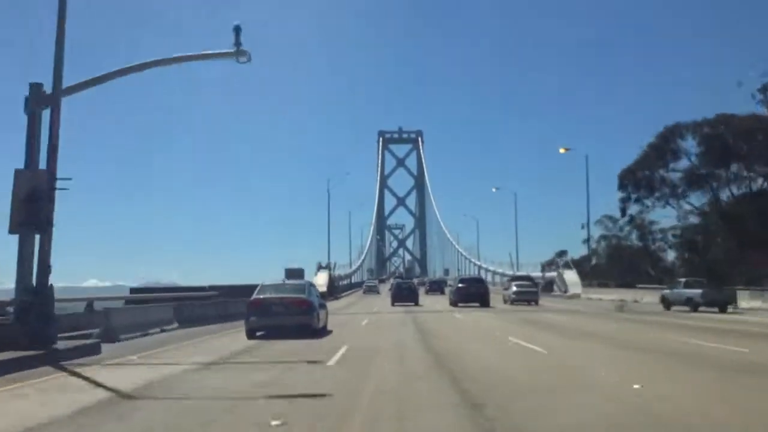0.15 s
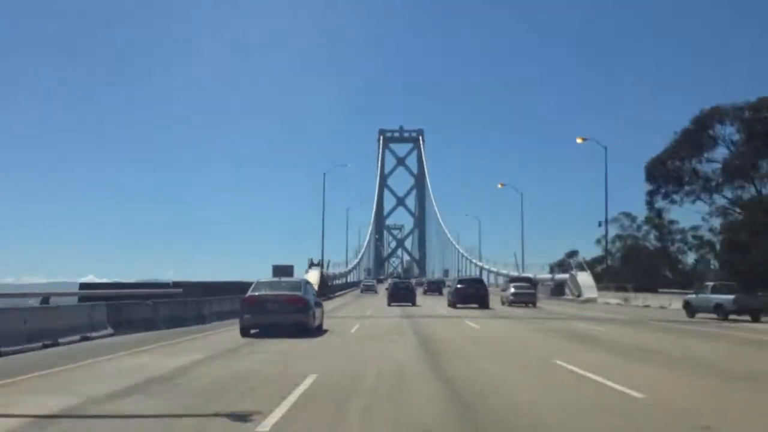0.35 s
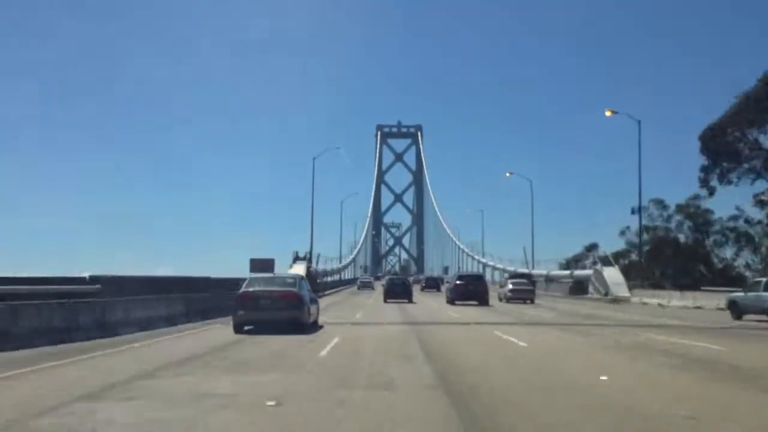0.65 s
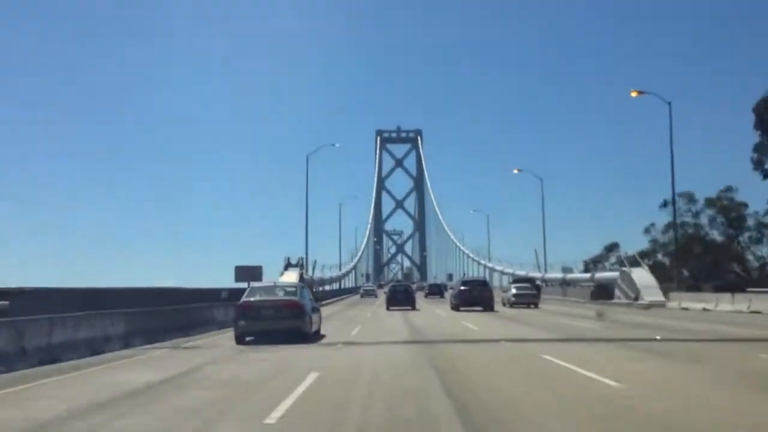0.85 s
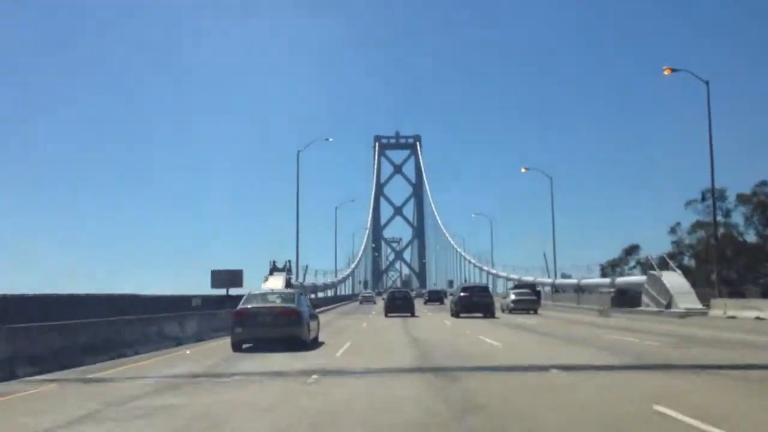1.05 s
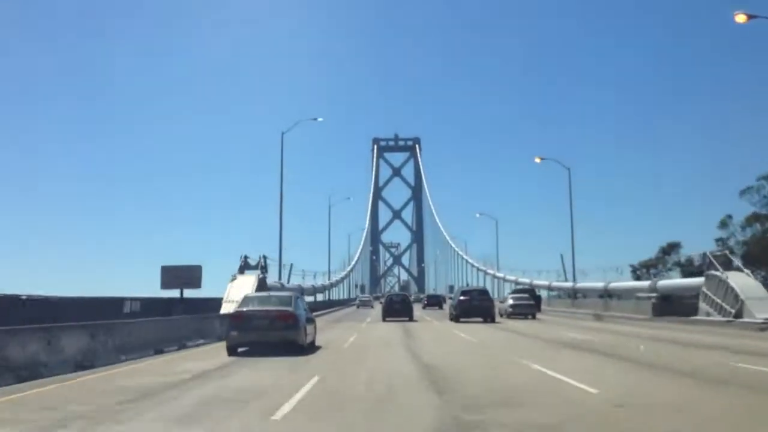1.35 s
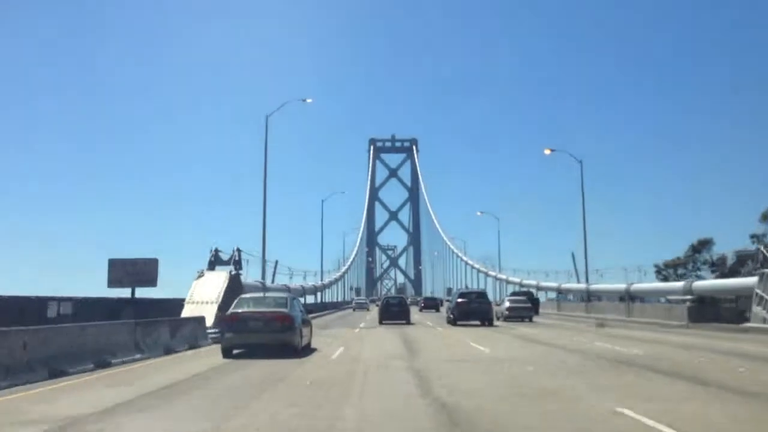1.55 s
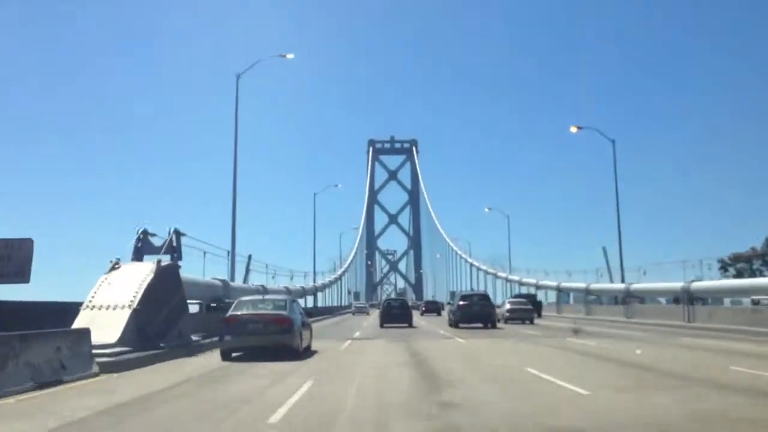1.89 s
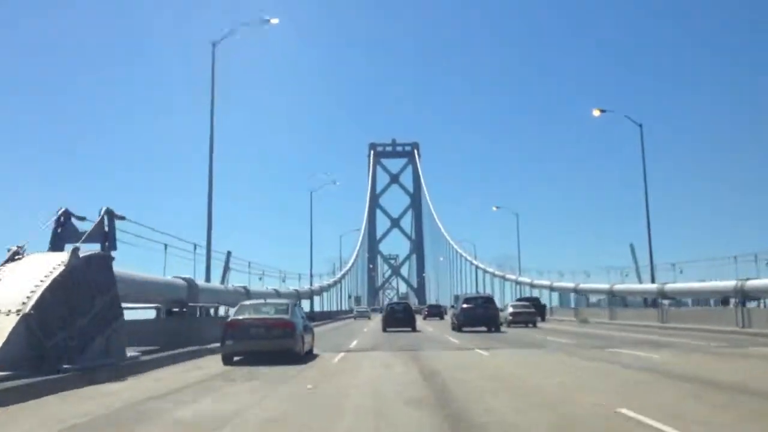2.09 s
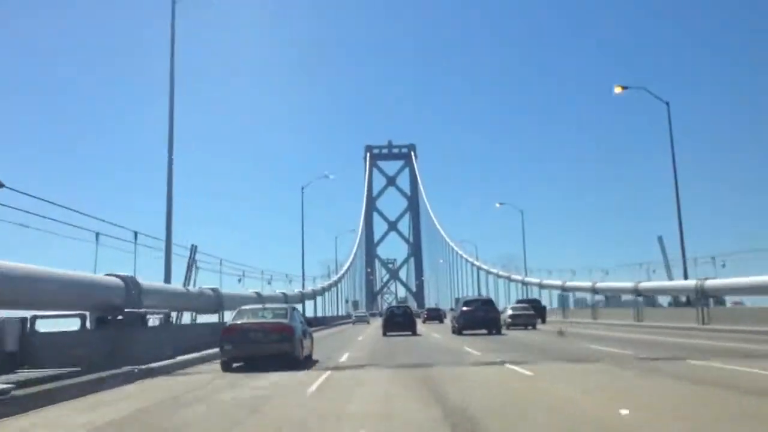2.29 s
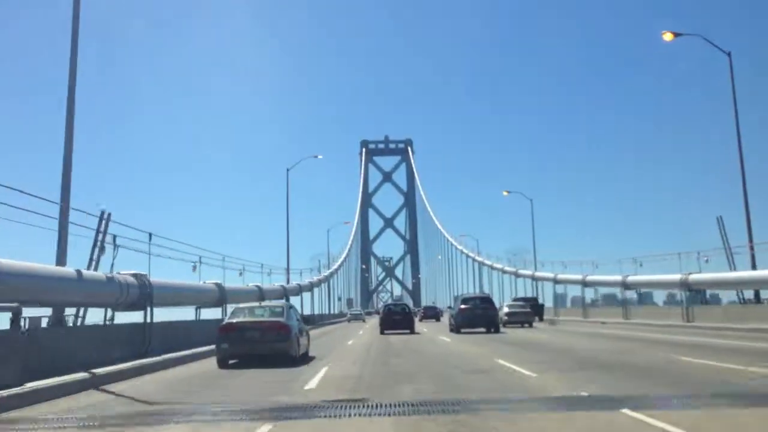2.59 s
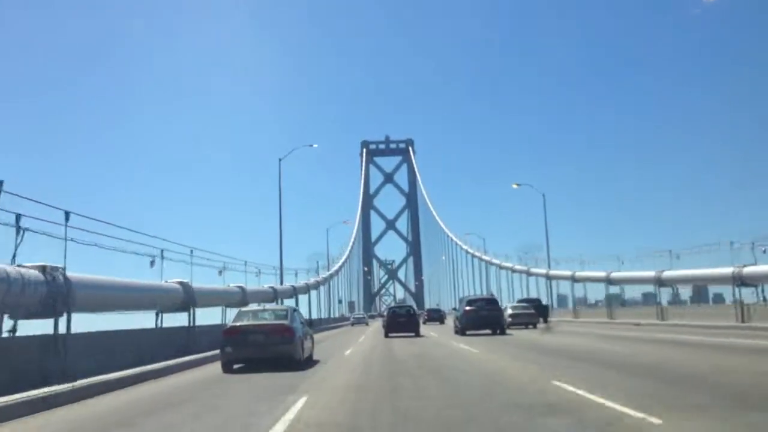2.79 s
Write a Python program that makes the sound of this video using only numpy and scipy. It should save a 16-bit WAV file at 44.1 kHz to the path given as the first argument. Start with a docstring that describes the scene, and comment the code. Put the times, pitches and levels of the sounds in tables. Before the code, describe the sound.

Car interior road noise heard from the front seat: low tyre drone, rumble and soft rush, a few dull thumps, then a hard double-bang over a steel bridge joint with rattling trim, then smoother, softer drone.

```python
"""Inside a car at highway speed as it rolls onto a bridge.
From the start the tyres drone over a low rumble and a soft rush of tread and wind, with a hum that fades.
A few wheel thumps, a seam slap or two and a faint strike lead up to the steel deck joint: there thumps, slaps
and ringing panels crowd together, trim crackles, ticks and knocks, and a small metal part jingles.
On the smoother deck the drone is softer, with one last faint thump. Noise is shaped by spectra; blows are sines."""
import sys
import numpy as np
from scipy import signal
from scipy.fft import rfft, irfft
from scipy.io import wavfile

SR = 44100
rng = np.random.default_rng(int(sys.argv[2]) if len(sys.argv) > 2 else 0)


def transcribe(signal):
    """Save signal, clipped to [-1, 1], as a 16-bit WAV file at the path in sys.argv[1]."""
    frames = np.atleast_2d(signal).T
    limited = np.clip(frames, -1, 1)
    pcm = np.round(limited * 32767).astype(np.int16)
    wavfile.write(sys.argv[1], SR, pcm)


N = 129213
T = np.arange(N) / SR  # seconds
HZ = np.fft.rfftfreq(N, 1 / SR)

# Bright colour shared by trim ticks and trim chatter. Each row: frequency in Hz, relative density in dB per Hz.
TICK_COLOUR = [(800, -19.5), (2500, 10.5), (5000, -1), (8000, -2), (11000, -2.5), (14000, -11),
               (15500, -22)]


def amp(db):
    """Decibels to gain."""
    return 10 ** (np.asarray(db) / 20)


def unit(x):
    """Scales to an rms of one."""
    return x / np.sqrt(np.mean(x ** 2) + 1e-20)


def colour(points):
    """Gain at each frequency from (Hz, dB) points, joined along a log frequency axis."""
    hz, db = np.transpose(points)
    return amp(np.interp(np.log(HZ + 1), np.log(hz), db))


def level(points):
    """Gain at each moment from (s, dB) points."""
    return amp(np.interp(T, *np.transpose(points)))


def noise(gain):
    """Noise of unit rms with the given spectrum and random phases."""
    phases = np.exp(2j * np.pi * rng.random(len(HZ)))
    return unit(irfft(gain * phases, N))


def flutter(rate_hz, depth_db):
    """A random wavering gain: depth is its rms in dB, and it wavers mostly slower than the rate."""
    return amp(depth_db * noise(1 / (1 + (HZ / rate_hz) ** 4)))


def resonances(modes):
    """Spectrum of steep resonances, each with its own share of the power."""
    return sum(amp(db) / np.sqrt(width) / (1 + (2 * (HZ - hz) / width) ** 2) for hz, width, db in modes)


def panels(share):
    """Lift that the body panels give to sound passing through them; share scales the lift in dB."""
    # Panel resonances. Each row: frequency in Hz, width in Hz, lift in dB at a share of one.
    panel_modes = [(353, 42, 9), (551, 53, 16), (681, 63, 16), (990, 28, 6), (1336, 110, 6.5)]
    lift_db = sum(db / (1 + (2 * (HZ - hz) / width) ** 2) for hz, width, db in panel_modes)
    return amp(share * lift_db)


def bursts(rows):
    """Envelope of contacts that each swell to a peak and die away; overlaps add in power."""
    power = np.zeros(N)
    for s, db, rise, decay in rows:
        swell = np.exp(-np.maximum((s - T) / rise, (T - s) / decay))
        power += (amp(db) * swell) ** 2
    return np.sqrt(power)


def rumble():
    """The road's grain shakes the body and the cabin's own air resonances."""
    # Road rumble in the cabin. Each row: frequency in Hz, relative density in dB per Hz.
    rumble_colour = [(20, -41.5), (40, -30), (65, -28), (82, -15.5), (100, -12), (135, -7.5), (190, -0.5),
                     (260, -4), (330, -8.5), (420, -11.5), (600, -25), (1200, -45), (3000, -82.5)]
    # The cabin's air resonances. Each row: frequency in Hz, width in Hz, relative power in dB.
    cabin_modes = [(104, 8.5, -7.5), (130.6, 9.3, -0.5), (174.4, 25, 0), (318.7, 23, 1)]
    # Coarseness of the road surface. Each row: time in seconds, rumble level in dB.
    surface = [(0, -23), (.2, -31), (.35, -30), (.45, -29), (.62, -27.5), (.77, -29.5), (.95, -27),
               (1.05, -28), (1.18, -27.5), (1.35, -31.5), (1.5, -29), (1.8, -32), (1.92, -30), (2.15, -34),
               (2.35, -32), (2.55, -28), (2.8, -31.5), (2.93, -37.5)]
    cabin_db = -3.5  # relative to the rumble
    body = noise(colour(rumble_colour))
    cabin_air = amp(cabin_db) * noise(resonances(cabin_modes))
    return (body + cabin_air) * level(surface)


def buffet():
    """Very quiet, lumpy low buffeting under the rumble: one broad resonance with a wavering level."""
    # The buffeting band. Each row: frequency in Hz, width in Hz, relative level in dB.
    buffet_mode = [(63, 62, 0)]
    buffet_db = -56.5
    narrowed = noise(resonances(buffet_mode) ** 2)
    return amp(buffet_db) * unit(narrowed * flutter(rate_hz=9, depth_db=5))


def tyre_drone():
    """Air kept ringing inside the tyres: narrow resonant noise with its swells partly evened out."""
    # Ringing of the tyre air. Each row: frequency in Hz, width in Hz, relative power in dB.
    tyre_modes = [(228.6, 25.8, -2.5), (243.6, 12, -11.5)]
    # Strength of the drone. Each row: time in seconds, level in dB.
    drone_level = [(0, -32.5), (.13, -28.5), (.22, -26), (.31, -25), (.355, -38.5), (.42, -26), (.475, -30),
                   (.56, -23.5), (.7, -29.5), (.76, -23.5), (.87, -43), (.97, -29), (1.02, -33.5),
                   (1.27, -25.5), (1.5, -31), (1.86, -37.5), (2.12, -29.5), (2.93, -35.5)]
    evenness = 0.35  # 0 leaves the swells, 1 nearly flattens them
    ringing = noise(resonances(tyre_modes))
    swells = abs(signal.hilbert(ringing)) + 0.1
    evened = ringing / swells ** evenness
    return unit(evened * flutter(rate_hz=31, depth_db=0.8)) * level(drone_level)


def hum():
    """A steady sine a little above the drone that fades away at an even rate in dB."""
    hum_hz, start_db, fall_db_per_s = 281.8, -22.5, 40.5
    return amp(start_db - fall_db_per_s * T) * np.sin(2 * np.pi * hum_hz * T)


def roar(gain):
    """Noise whose overlapping bands each swell and sink on their own as the road's grain changes."""
    # Centres of the bands in Hz.
    centres_hz = [300, 600, 1000, 1600, 2600, 4500]
    # crossfading weights: at every frequency the bands add up to the whole
    shares = [np.interp(HZ, centres_hz, row) for row in np.eye(len(centres_hz))]
    whole = rfft(noise(gain))
    return unit(sum(irfft(whole * share, N) * flutter(rate_hz=19, depth_db=1.14) for share in shares))


def tread_rush():
    """Tread noise coloured by the body panels, swelling band by band."""
    # Rush of the tread. Each row: frequency in Hz, relative density in dB per Hz.
    tread_colour = [(150, -20.5), (400, -0.5), (540, -1.5), (620, -5), (800, -3.5), (1100, -4.5),
                    (1400, -7.5), (2000, -13.5), (3000, -24.5), (4500, -34.5), (8000, -62.5)]
    # Level of the rush. Each row: time in seconds, level in dB.
    tread_level = [(0, -35), (.1, -36), (.3, -39.5), (.6, -37.5), (.88, -38.5), (.96, -38.5), (1.06, -37.5),
                   (1.5, -38.5), (1.9, -40.5), (2.3, -40), (2.55, -39), (2.93, -40)]
    rush = roar(colour(tread_colour) * panels(share=0.37))
    return rush * level(tread_level) * flutter(rate_hz=22, depth_db=0.6)


def wind():
    """Wind along the windows: wavering broadband noise that slowly eases."""
    # Hiss at the glass. Each row: frequency in Hz, relative density in dB per Hz.
    wind_colour = [(300, -7.5), (1500, -2), (3200, -2.5), (4500, -0.5), (5500, -7.5), (7000, -12),
                   (9000, -21), (15000, -24.5)]
    start_db, drop_db = -60.5, -1.5  # the drop is spread over the whole scene
    easing = amp(start_db + drop_db * T / T[-1])
    return easing * noise(colour(wind_colour)) * flutter(rate_hz=22, depth_db=1.6)


def thumps():
    """Wheel blows through the suspension: the body booms for a few cycles, sagging a little in pitch."""
    # The blows. Each row: start in seconds, level in dB, starting pitch in Hz, time to the peak in seconds.
    blows = [(0.382, -14, 233.5, 0.012), (0.422, -17.5, 224, 0.015), (.752, -14, 230, 0.013),
             (.854, -15, 240, 0.0097), (.951, -15, 223.3, 0.013), (1.24, -19.5, 230, 0.012),
             (2.447, -23, 197, 0.014), (1.574, -11.5, 206, 0.0037), (1.5825, -8.5, 332, 0.0074),
             (1.588, -4.5, 201, 0.0091), (1.598, -21, 375, 0.0091), (1.611, -5, 250, 0.0043),
             (1.628, -9, 158.4, 0.0094), (1.645, -12, 178, 0.0059), (1.675, -17.5, 358, 0.0039),
             (1.6851, -6, 152.4, 0.008), (1.704, -5.5, 179, 0.012), (1.713, -21.5, 97, 0.015),
             (1.744, -7.5, 177, 0.007), (1.802, -20, 165.6, 0.018)]
    shape = 2.4  # higher makes a tighter swell
    sag = 0.011  # share of the pitch lost per time-to-peak
    out = np.zeros(N)
    for s, db, hz, length in blows:
        u = np.clip((T - s) / length, 0, 10)
        boom = np.sin(2 * np.pi * hz * length * u * (1 - sag * u / 2))
        out += amp(db) * (u * np.exp(1 - u)) ** shape * boom
    return out


def slaps():
    """Tread slapping seams and the steel of the joint: gritty noise bursts through the body panels."""
    # The slaps. Each row: peak time in seconds, level in dB, rise in seconds, decay in seconds.
    slap_times = [(.865, -35, 0.0049, 0.0077), (.963, -35, 0.0083, 0.0094), (1.587, -26, 0.011, 0.013),
                  (1.5925, -26, 0.00073, 0.008), (1.622, -30, 0.0096, 0.025), (1.686, -28, 0.012, 0.022),
                  (1.712, -34.5, 0.012, 0.027), (1.760, -33.5, 0.0064, 0.0076)]
    # Colour of a slap. Each row: frequency in Hz, relative density in dB per Hz.
    slap_colour = [(30, -30.5), (180, -14), (320, -9), (450, -5.5), (700, -8), (1100, -12), (1600, -17.5),
                   (2500, -23), (4500, -34.5), (6500, -44), (15000, -60)]
    grit = flutter(rate_hz=97, depth_db=1)
    return noise(colour(slap_colour) * panels(share=0.5)) * bursts(slap_times) * grit


def strikes():
    """Wheels striking edges in the deck ring the body; each blow favours the modes near its own pitch."""
    # The strikes. Each row: start in seconds, level in dB, pitch struck hardest in Hz, rise in seconds.
    edges = [(.955, -32, 720, .003), (1.574, -28, 520, .002), (1.5799, -19, 1120, .004),
             (1.5915, -16, 660, .0004), (1.617, -30, 800, .001), (1.630, -19, 280, .003),
             (1.631, -31, 1300, .001), (1.686, -24.5, 570, .0007), (1.7053, -24.5, 620, .0008),
             (1.7246, -26, 520, .003)]
    # What the body rings with. Each row: frequency in Hz, relative level in dB, time to fall 60 dB in seconds.
    body_modes = [(321.7, 4, 0.14), (377, -7, 0.11), (507, 2.5, 0.092), (683, -1.5, 0.054),
                  (738, -3, 0.037), (955, -9, 0.068), (1040, -1.5, 0.077), (1200, -10.5, 0.065),
                  (1330, -5.5, 0.08), (1970, -13, .06)]
    focus_db = 11  # loss one octave from the pitch struck hardest, growing with the square of the octaves
    out = np.zeros(N)
    for s, strength_db, centre_hz, rise in edges:
        t = np.maximum(T - s, 0)
        ring = np.zeros(N)
        for hz, db, t60 in body_modes:
            loss_db = focus_db * np.log2(hz / centre_hz) ** 2
            ring += amp(db - loss_db - 60 * t / t60) * np.sin(2 * np.pi * hz * t)
        out += amp(strength_db) * (1 - np.exp(-t / rise)) * ring
    return out


def chatter():
    """A dense crackle of tiny random contacts in the trim, heard while the body shakes."""
    # Strength of the chatter. Each row: time in seconds, level in dB.
    chatter_level = [(1.56, -88), (1.59, -69.5), (1.61, -66), (1.635, -60), (1.67, -60.5), (1.70, -68),
                     (1.74, -57), (1.765, -52), (1.80, -56), (1.825, -62), (1.87, -82)]
    contacts_per_s = 2500  # on average
    touching = rng.random(N) < contacts_per_s / SR
    contacts = rng.standard_normal(N) * touching
    return unit(irfft(rfft(contacts) * colour(TICK_COLOUR), N)) * level(chatter_level)


def trim_ticks():
    """Loose trim shaken by the jolt: short bright noise bursts with a rough edge."""
    # The ticks. Each row: peak time in seconds, level in dB, rise in seconds, decay in seconds.
    tick_times = [(1.624, -70, 0.0048, 0.0071), (1.639, -47, 0.0012, 0.004), (1.6595, -47, .0003, 0.0033),
                  (1.7245, -47, .0003, 0.0018), (1.752, -39, 0.00022, .0015),
                  (1.757, -35.5, 0.0022, 0.0045), (1.768, -49, .002, 0.007), (1.784, -50, 0.0022, .007),
                  (1.810, -49, 0.0022, 0.0042)]
    return noise(colour(TICK_COLOUR)) * bursts(tick_times) * flutter(rate_hz=690, depth_db=1)


def panel_knocks():
    """A plastic panel knocking: noise bursts with a few strong bands."""
    # The knocks. Each row: peak time in seconds, level in dB, rise in seconds, decay in seconds.
    knock_times = [(1.758, -35.5, 0.0014, 0.0037), (1.762, -36, 0.0017, 0.007), (1.809, -47, .003, 0.0053)]
    # Colour of the plastic. Each row: frequency in Hz, relative density in dB per Hz.
    knock_colour = [(500, -8), (1200, 1), (2200, 10.5), (3200, -13), (4800, 3), (7000, -33), (14000, -42)]
    return noise(colour(knock_colour)) * bursts(knock_times)


def metal_jingle():
    """A small metal part touching: brief bursts of noise narrowed to its high modes."""
    # The touches. Each row: peak time in seconds, level in dB, rise in seconds, decay in seconds.
    touches = [(1.758, -51, .002, 0.0061), (1.786, -42, 0.0037, 0.0072)]
    # Modes of the metal. Each row: frequency in Hz, width in Hz, relative power in dB.
    metal_modes = [(5650, 250, -14), (7110, 490, -1), (8450, 420, -6.5), (10470, 400, -13),
                   (12340, 250, -19), (14050, 440, -9)]
    return noise(resonances(metal_modes)) * bursts(touches)


def scene():
    """Everything heard from the front seat, as one channel."""
    road = rumble() + buffet() + tyre_drone() + hum()
    rush = tread_rush() + wind()
    impacts = thumps() + slaps() + strikes()
    rattles = chatter() + trim_ticks() + panel_knocks() + metal_jingle()
    return (road + rush + impacts + rattles)[None]


def record(dry):
    """The recorder's band limit: a steep, delay-free low-pass."""
    cutoff_hz = 15500
    lowpass = signal.firwin(511, cutoff_hz, window=("kaiser", 9), fs=SR)
    return signal.oaconvolve(dry, lowpass[None], "same")


dry = scene()
out = record(dry)
transcribe(out)
```